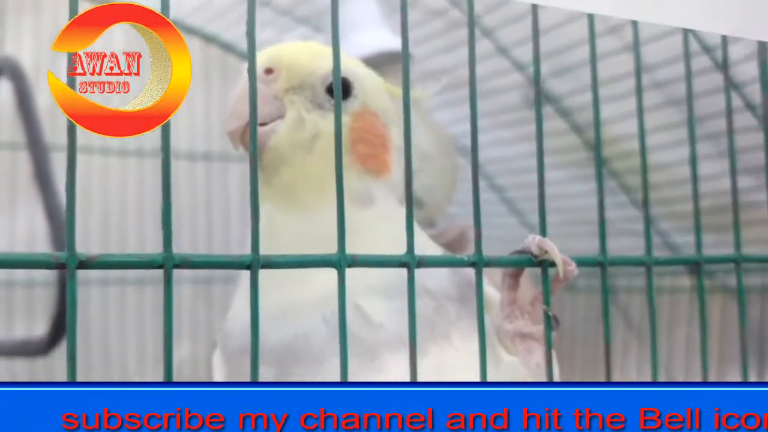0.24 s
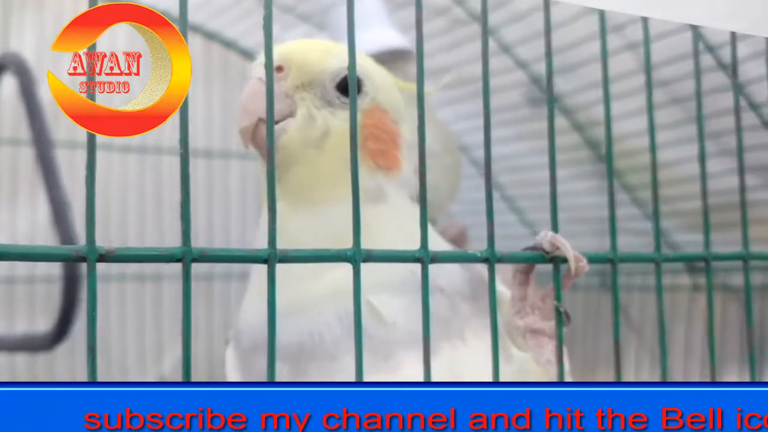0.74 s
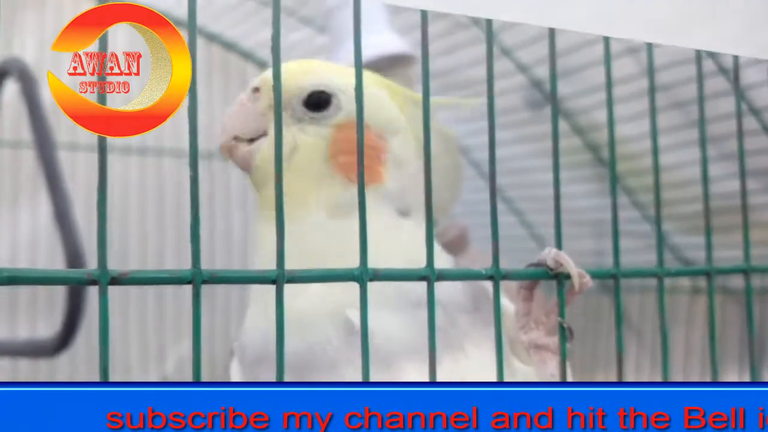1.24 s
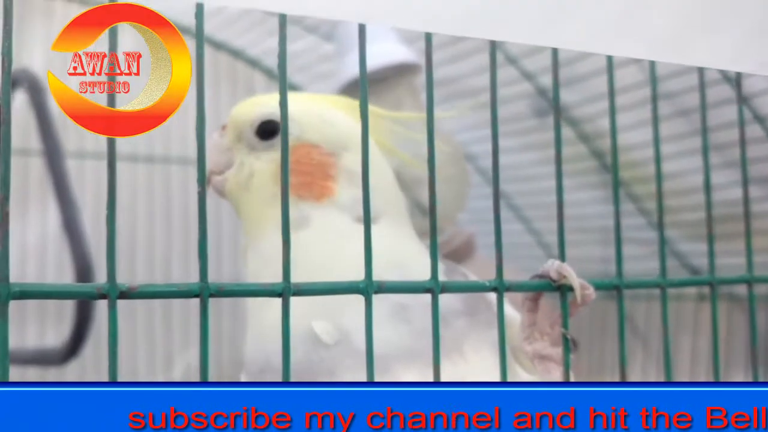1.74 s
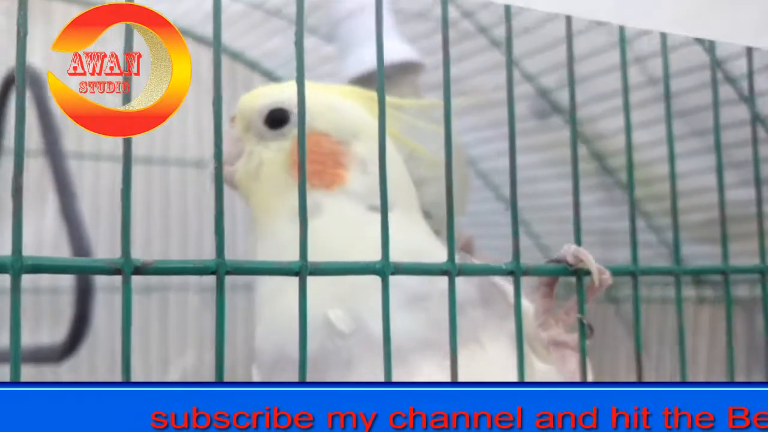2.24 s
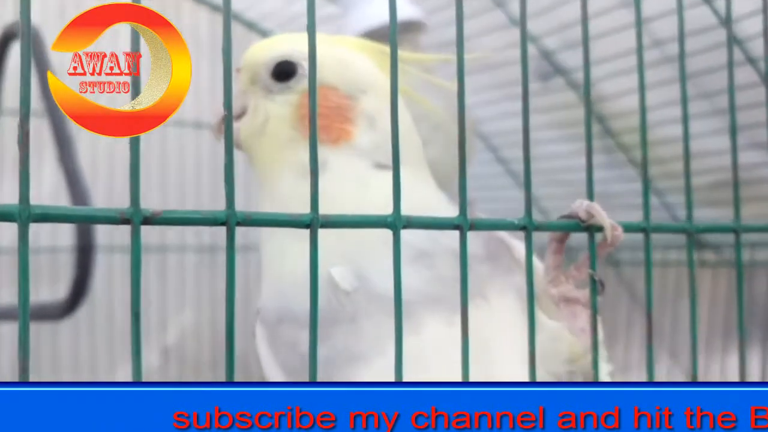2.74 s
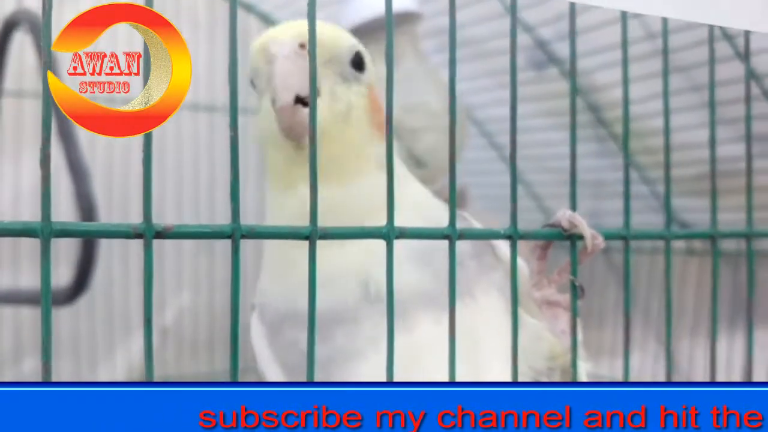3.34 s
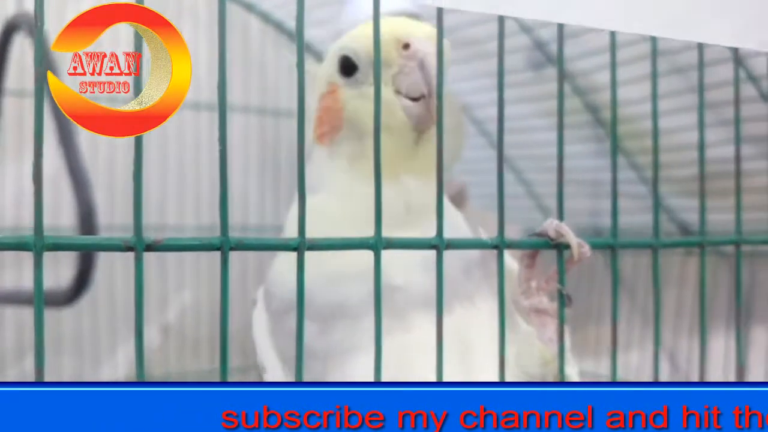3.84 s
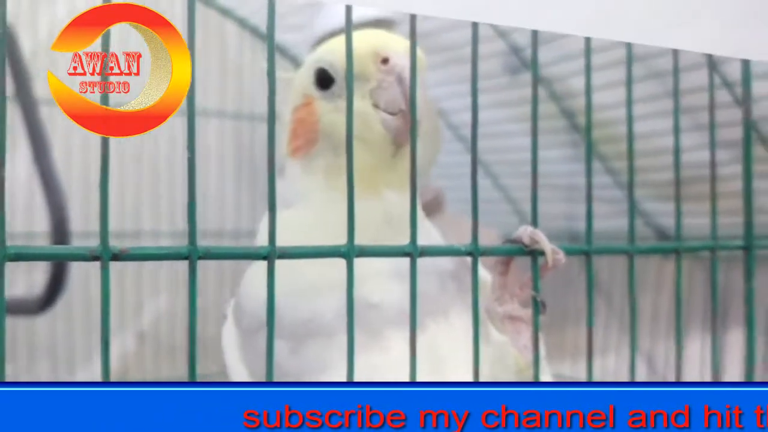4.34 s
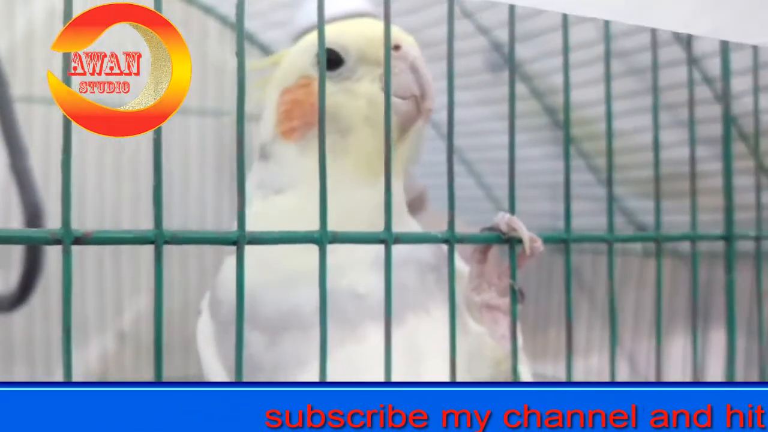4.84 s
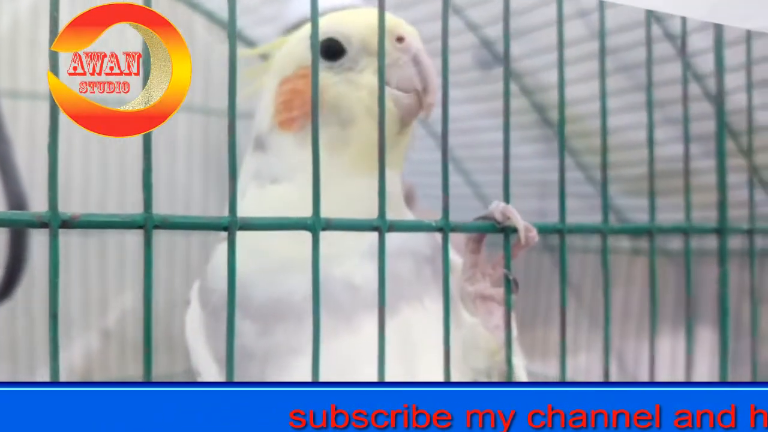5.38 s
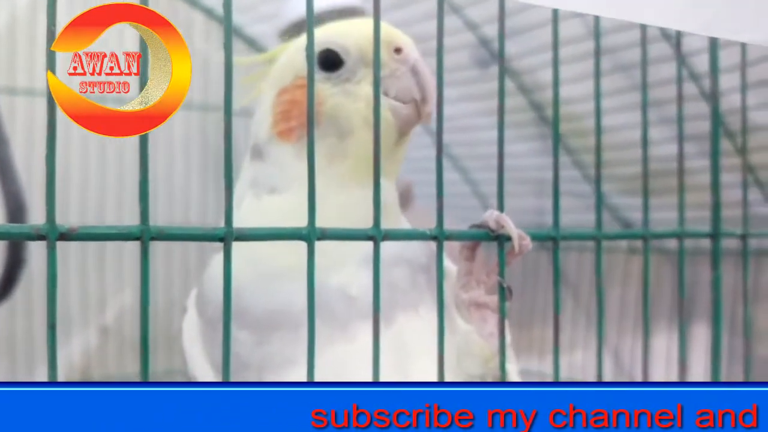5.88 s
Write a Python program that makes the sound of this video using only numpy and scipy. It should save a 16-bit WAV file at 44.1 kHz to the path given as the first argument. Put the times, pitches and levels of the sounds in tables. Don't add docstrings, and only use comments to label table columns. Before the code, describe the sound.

A cockatiel close by gives short, clear falling whistles in a small hard room, over fan hum, hiss and soft low air thumps.

```python
import sys
import numpy as np
from scipy import signal
from scipy.fft import rfft, irfft
from scipy.io import wavfile
from scipy.ndimage import uniform_filter1d

SR = 44100
rng = np.random.default_rng(int(sys.argv[2]) if len(sys.argv) > 2 else 0)


def unload_audio(sound):
    columns = np.transpose(np.atleast_2d(sound))
    steps = np.round(np.clip(columns, -1, 1) * 32767)
    wavfile.write(sys.argv[1], SR, steps.astype(np.int16))


def invert_db(level):
    return 10 ** (np.asarray(level, dtype=float) / 20)


N = 269451


def evened(x):
    return x / np.sqrt(np.mean(x ** 2) + 1e-20)


def read(points, hz):
    f, value = np.transpose(points)
    return np.interp(np.log(hz + 1), np.log(f + 1), value)


def add(mix, start_s, sound):
    part = mix[..., max(round(start_s * SR), 0):][..., :sound.shape[-1]]
    part += sound[..., :part.shape[-1]]


def wobble(count, size):
    return evened(uniform_filter1d(uniform_filter1d(rng.standard_normal(count), size), size))


# freq_hz, density_db (per Hz)
AIR_SPECTRUM = [(20, -34), (60, 0.5), (150, -7.5), (300, -8), (950, -11.5), (1200, -3), (1550, 0.15),
                (1900, -6), (2080, -18), (3100, -11.5), (3600, -22.5), (8500, -34.5), (13000, -34),
                (15200, -26)]


def air(level_db=-56.5, patchy_db=2.0, throb_db=-4.5, left_db=1.67):
    frames, hz = N // 256 + 5, np.fft.rfftfreq(1024, 1 / SR)
    a, b, c, d, patches = rng.standard_normal((frames, 513, 5)).T
    patches = evened(uniform_filter1d(uniform_filter1d(patches, 10, 0), 12, 1))
    throb = wobble(frames, 4) * np.exp(-((hz[:, None] - 1550) / 450) ** 2)
    z = np.array([a + 1j * b, c + 1j * d])
    z *= invert_db(read(AIR_SPECTRUM, hz)[:, None] + patchy_db * patches + throb_db * throb)
    hiss = evened(signal.istft(z, nperseg=1024, noverlap=768)[1][:, :N])
    return invert_db(level_db + np.array([[left_db], [-left_db]])) * hiss


# freq_hz, width_hz, level_db
MOTOR = (140, 29.6, -71)


def hum():
    hz, width_hz, db = MOTOR
    size = round(SR / width_hz / 2)
    fuzz = wobble(N, size) + 1j * wobble(N, size)
    carrier = np.exp(2j * np.pi * hz * np.arange(N) / SR)
    return invert_db(db) * evened((fuzz * carrier).real)


# time_s, pitch_hz, level_db
FAR_WHINE = [
    (1.76, 1304, -66),
    (2.183, 1212, -64.5),
    (2.21, 1270, -77),
]


def whine():
    s, hz, db = np.transpose(FAR_WHINE)
    t = np.arange(s[0], s[-1], 1 / SR)
    phase = 2 * np.pi * np.cumsum(np.interp(t, s, hz)) / SR
    tone = np.sqrt(2) * invert_db(np.interp(t, s, db)) * np.cos(phase)
    waver = invert_db(2.5 * np.array([wobble(len(t), 700), wobble(len(t), 700)]))
    return s[0], tone * signal.windows.tukey(len(t), .2) * waver


# peak_s, peak_db, freq_hz, cycles
AIR_PUFFS = [(0.162, -26.5, 213, 0.48), (0.212, -46, 151, 1.3), (0.243, -40.5, 109.4, 1.4),
             (2.295, -47.5, 142, 1.4), (2.387, -33.5, 110, 0.73), (2.478, -42.5, 96, 3.2),
             (2.517, -39.5, 106, 1.1), (2.546, -42, 110, 3.4), (2.569, -35.5, 169, 0.2),
             (2.587, -32.5, 210, 0.33), (2.61, -47, 194, 1.2), (2.649, -33.5, 135, 0.47),
             (2.674, -47, 113, 5.4), (2.754, -43, 96, 1.7), (2.778, -40, 113, 0.53),
             (2.879, -28.5, 132, 0.91), (3.036, -34, 120, 0.77), (3.058, -45, 93, 1.9),
             (3.078, -30.5, 118, 0.87), (3.11, -43, 109, 4.5), (3.153, -45, 134, 0.54),
             (3.186, -40, 104, 1.6), (3.205, -36, 118, 1.05), (3.227, -49.5, 78, 1.7), (3.487, -37, 457, 3),
             (3.556, -50, 218, 1.5), (4.145, -25.5, 139, 0.29), (6.076, -46, 262, 2.2),
             (3.502, -43.5, 77, 1.8),
]


def puff(peak_s, db, hz, cycles, sag=0.1, right_db=-22):
    u = np.arange(-2 * SR // 100, 4 * SR // 100) / SR * hz / cycles
    shape = np.exp(-(u / np.where(u < 0, .45, .7)) ** 2)
    swing = np.cos(2 * np.pi * cycles * u / (1 + sag * abs(u)) + 0.29)
    push = -invert_db(db) * shape * swing * signal.windows.tukey(len(u), .3)
    return peak_s - .02, push * invert_db([[0], [right_db]])


# left_ms, left_db, right_ms, right_db
REFLECTIONS = [(2.1, -114, 2.897, -12), (4.7, -12, 5.3, -7.5)]
# t60_s, level_db
DECAYS = [(0.196, -12.5), (0.802, -27.5)]


def room(x):
    response = np.zeros((2, SR))
    at = np.arange(500, SR - 20, 20) + rng.integers(0, 20, (2, (SR - 501) // 20))
    np.put_along_axis(response, at, rng.choice([-1., 1.], at.shape), 1)
    t = np.arange(SR) / SR
    tap_power = 0
    for t60, db in DECAYS:
        tap_power = tap_power + invert_db(2 * (db - 60 * t / t60)) * 20 * 6 * np.log(10) / t60 / SR
    response *= np.sqrt(tap_power)
    for left_ms, left_db, right_ms, right_db in REFLECTIONS:
        response[0, round(left_ms * SR / 1000)] += invert_db(left_db)
        response[1, round(right_ms * SR / 1000)] += invert_db(right_db)
    return signal.fftconvolve(x[None], response, axes=1)[:, :N]


# time_s, left_lead_samples
PORT_LEADS = [(0, 9), (1.5, 9), (1.66, 10.5), (2.2, 4), (2.38, 12.5), (2.54, 5.5), (2.74, 7.5), (3.22, 12),
              (3.4, 7), (3.55, -7), (3.68, 6), (6.1, 6)]
# start_s, end_s, level_db (re the whistle)
HALF_PITCH = [
    (5.659, 5.694, -9.5),
]
# freq_hz, level_db (re the whistle)
BEAK_COLOUR = [(3800, -46), (5100, -12), (6500, -22), (8500, -47.5), (12000, -27.5), (15000, -20.5),
               (16500, -51)]


def note(t, hz, effort_db, octave_db, pan_db, jitter=0.0032, shimmer_db=1.05, pressed=0.56, rush_db=-38,
         flutter_db=2.0):
    count = len(t)
    lag = np.interp(t[0], *np.transpose(PORT_LEADS))
    hz, effort_db, octave_db = (uniform_filter1d(c, 60) for c in (hz, effort_db, octave_db))
    turns = np.cumsum(hz * (1 + jitter * wobble(count, 60))) / SR + rng.random()
    half = sum(invert_db(db) * np.clip(np.minimum(t - a, b - t) / 0.006, 0, 1) for a, b, db in HALF_PITCH)
    level = np.sqrt(2) * invert_db(effort_db + shimmer_db * wobble(count, 90))
    beak = signal.butter(2, [4500, 12000], "bandpass", fs=SR)

    def flutter():
        return invert_db(flutter_db * wobble(count, 60))

    octave_db = octave_db - np.clip((3500 - 2 * hz) / 30, 0, 20)
    octave = flutter() * invert_db(octave_db)
    higher = []
    for k in range(3, 9):
        higher.append((k, invert_db(read(BEAK_COLOUR, k * hz) + pressed * octave_db) * flutter()))
    ports = []
    for side in (1, -1):
        phase = 2 * np.pi * (turns + side * .5 * lag * hz / SR)
        overtones = octave * np.cos(2 * phase) + sum(g * np.cos(k * phase) for k, g in higher)
        half_lines = half * (np.cos(1.5 * phase) + .1 * np.cos(.5 * phase))
        rush = invert_db(rush_db) * signal.lfilter(*beak, rng.standard_normal(count))
        ports.append(invert_db(side * .5 * pan_db) * (np.cos(phase) + overtones + half_lines + rush))
    return t[0], level * np.array(ports) * signal.windows.tukey(count, .08)


# time_s, pitch_hz, effort_db
PEEP_CURVES = [
    [(.75, 2133, -68), (.757, 2138, -27), (.773, 1821, -22.5), (.798, 1787, -28.5), (.808, 1540, -30),
     (.824, 1580, -58)],
    [(1.493, 1768, -41), (1.51, 1585, -31), (1.551, 1632, -28), (1.564, 1510, -57)],
    [(2.216, 1210, -59), (2.222, 1254, -37), (2.233, 1310, -40), (2.268, 1383, -41), (2.278, 1180, -47)],
    [(3.546, 1540, -35), (3.552, 1529, -36.5), (3.565, 1582, -29), (3.585, 1698, -42.5), (3.596, 1765, -24),
     (3.619, 1679, -31), (3.632, 1574, -53)],
    [(5.637, 1600, -58), (5.644, 1630, -36), (5.66, 1443, -32.5), (5.679, 1502, -31.5), (5.704, 1390, -38)],
]
# octave_db (re the whistle), octave_change_db (along the note), left_right_db
PEEP_TONE = [(-24.5, 16, 5.5), (-24.5, 2.5, -6), (-18.5, 23, -4.5), (-21.5, 8.5, -1.2), (-34, 22, -1.5)]
# time_s, pitch_hz, effort_db
BROKEN_CURVES = [
    [(2.54, 2265, -36.5), (2.566, 2136, -30), (2.605, 2178, -13.5), (2.617, 2053, -37),
     (2.625, 1640, -35.5), (2.634, 1450, -39)],
    [(1.66, 2360, -60), (1.668, 2342, -33.5), (1.688, 2427, -17.5), (1.7, 2338, -19), (1.721, 2348, -24.5),
     (1.739, 2140, -41.5)],
    [(2.377, 2160, -49), (2.389, 2112, -24), (2.409, 2056, -27.5), (2.42, 2002, -28.5), (2.428, 1984, -25),
     (2.444, 1903, -38.5)],
    [(2.746, 2369, -25), (2.762, 2244, -17), (2.803, 2236, -14.5), (2.815, 2126, -18), (2.82, 1974, -23),
     (2.835, 1840, -42.5)],
    [(4.205, 1932, -63), (4.211, 1870, -33), (4.217, 2104, -33), (4.255, 2220, -31), (4.265, 2080, -29.5),
     (4.277, 1400, -28), (4.293, 1107, -53)],
]
# octave_db (re the whistle), octave_change_db (along the note), left_right_db
BROKEN_TONE = [(-26.5, -7.5, 6), (-23, -5.5, 2), (-5, -4.5, 7), (-12.5, -13, 2.5), (-26.5, 1, 2)]


def peep(rows, octave_db, change_db):
    s, hz, effort_db = np.transpose(rows)
    t = np.arange(s[0], s[-1], 1 / SR)
    along = (t - s[0]) / (s[-1] - s[0])
    return t, np.interp(t, s, hz), np.interp(t, s, effort_db), octave_db + change_db * along


def peeps_and_broken(bird):
    for rows, (*octave, pan_db) in zip(PEEP_CURVES + BROKEN_CURVES, PEEP_TONE + BROKEN_TONE):
        add(bird, *note(*peep(rows, *octave), pan_db))


# freq_hz, width_hz, level_db
WINDPIPE_PEAKS = [(2230, 160, 4), (1815, 94, 2), (1540, 113, 3)]


def falling(glide, landing_hz, plunge_ms, landing_db, edges, voice):
    onset, landing, entry_hz, aim_hz = glide
    scoop_hz, lift_db, release_ms, surge = edges
    effort_db, swell_db, early, octave_db = voice
    attack_s, attack_db, release_db, sag_hz_per_s = 0.0063, -25.5, -15.5, 16000
    snap_s, snap_share, scoop_s = .005, .3, 0.01087
    swell_ends = 1.96
    t = np.arange(max(onset, 0), landing + release_ms / 1000, 1 / SR)
    since, length, plunge_s = t - onset, landing - onset, plunge_ms / 1000
    before, after = np.minimum(t - landing, 0), np.maximum(t - landing, 0)
    given = (1 - snap_share) * np.exp(before / plunge_s) + snap_share * np.exp(before / snap_s)

    course = entry_hz + (aim_hz - entry_hz) * np.minimum(since / length, 1)
    course = course + scoop_hz * np.exp(-since / scoop_s)
    hz = course - (aim_hz - landing_hz) * given - sag_hz_per_s * after

    short = np.clip(1 - since / (length - swell_ends * plunge_s), 0, 1) ** early
    short = short ** surge / (short ** surge + (1 - short) ** surge)
    pipe_db = sum(db * np.exp(-((hz - f) / width) ** 2) for f, width, db in WINDPIPE_PEAKS)
    edges_db = attack_db * np.clip(1 - since / attack_s, 0, 1) + release_db * after * 1000 / release_ms
    effort = effort_db - swell_db * short + (landing_db - effort_db) * given + edges_db + pipe_db
    return t, hz, effort, octave_db + lift_db * given


# onset_s, landing_s, entry_hz, aim_hz, landing_hz
DIP_GLIDES = [
    (1.114, 1.17, 2209, 2232, 1834),
    (3.377, 3.429, 2109, 2194, 1857),
    (3.91, 3.966, 2215, 2171, 1840),
]
# effort_db, swell_db, swell_earliness, octave_db (re the whistle), left_right_db
DIP_BREATH = [(-18.5, 8.5, 0.8, -13.5, -1.5), (-20, 4.5, .9, -11, 0.3), (-18, 12.5, 2.5, -19.5, 0.5)]


def dips(bird):
    edges = (110, 13.5, 10.5, 2.3)
    for (*glide, landing_hz), (*voice, pan_db) in zip(DIP_GLIDES, DIP_BREATH):
        add(bird, *note(*falling(glide, landing_hz, 8, -26, edges, voice), pan_db))


# onset_s, landing_s, entry_hz, aim_hz, plunge_ms (time constant)
DIVE_GLIDES = [(-.01, 0.028, 2420, 2304, 10.4), (0.137, 0.193, 2380, 2404, 10.4),
               (0.332, 0.385, 2084, 2092, 6.1), (0.5, 0.576, 2141, 2353, 7.2),
               (0.909, .982, 2374, 2355, 13), (1.281, 1.334, 2248, 2230, 7.6),
               (2.893, 2.975, 2578, 2517, 22), (3.065, 3.137, 2594, 2367, 18),
               (3.223, 3.291, 2610, 2383, 24), (3.72, 3.783, 2070, 2318, 9.3),
               (4.061, 4.134, 2490, 2425, 18), (4.431, 4.507, 2538, 2406, 20),
               (4.587, 4.666, 2522, 2632, 20), (4.808, 4.867, 2427, 2324, 19),
               (4.974, 5.049, 2190, 2380, 9.8), (5.217, 5.279, 2230, 2305, 11),
               (5.395, 5.472, 2073, 2347, 8.3), (5.793, 5.87, 2454, 2300, 12),
               (6.019, 6.077, 2479, 2277, 12.4)]
# scoop_hz, octave_lift_db (in the plunge), release_ms,
# surge (over 1 gathers the swell into one step)
DIVE_ENDS = [(-7.5, -17, 15.5, 1.1), (-25, -13, 9.1, 2.2), (60.5, -1, 20, 1.2), (-15, -18.5, 8, 1.7),
             (-200, -31, 9.5, 1.8), (-35, -15, 8, 3.5), (-130, -17, 6.5, 1.2), (-120, -7, 10.7, 1.6),
             (-150, 21.5, 3.1, 0.68), (-120, -10, 4.9, 1.4), (-140, -30, 11, 1), (-220, -35, 2.6, 0.77),
             (-220, -53, 22.7, 1.5), (-37.5, -28, 10, 1), (-88, -12, 17, 1.5), (51, 0.5, 13, 2.2),
             (75, -32, 9.9, 3.4), (-260, -25, 5.8, 2.9), (-190, -2, 16, 0.97)]
# effort_db, swell_db, swell_earliness (under 1 late, over 1 early),
# octave_db (re the whistle), left_right_db
DIVE_BREATH = [(-18.5, -17, .9, -29, -2.5), (-22, 13.5, 0.71, -28, 2), (-30, 2, 1, -35.5, 2.5),
               (-19.5, 20, 0.45, -29, -2.6), (-19.5, 21, 0.64, -28.5, 2.8), (-12.5, 10, 0.34, -29, -1.5),
               (-16, 15, 1.1, -36, 3.5), (-15.5, 14.5, 0.69, -25.5, 7.5), (-16, 14.5, 0.43, -19.5, 1),
               (-17, 16, 0.9, -31.5, 2), (-14.5, 18, 3.3, -29, -2), (-14, 14.5, 1.2, -24, -1),
               (-13, 13.5, 0.59, -22, -0.7), (-19, 11, 1.7, -28.5, 1.3), (-15.5, 27, 1.02, -36, -0.8),
               (-19, 10, 1.55, -30.5, -3), (-18, 20, 0.57, -35.5, -1.8), (-21.5, 17.5, 1.4, -29.5, -.6),
               (-19.5, 11.5, 1.9, -33, -0.2)]


def dives(bird):
    bottom_hz, landing_db = 1400, -31.5
    for (*glide, plunge_ms), edges, (*voice, pan_db) in zip(DIVE_GLIDES, DIVE_ENDS, DIVE_BREATH):
        add(bird, *note(*falling(glide, bottom_hz, plunge_ms, landing_db, edges, voice), pan_db))


def scene():
    bird = np.zeros((2, N))
    peeps_and_broken(bird)
    dips(bird)
    dives(bird)
    mix = bird + room(bird[0]) + air() + hum()
    add(mix, *whine())
    for row in AIR_PUFFS:
        add(mix, *puff(*row))
    return mix


def resampled(dry):
    source_rate, block_in, block_out, block_start = 48000, 1024, 941, 430
    fine = signal.resample_poly(dry, block_in, block_out, axis=1)
    block, step = np.divmod(np.arange(N) - block_start, block_out)
    place = block * block_in + step * source_rate // SR + block_start * block_in // block_out
    return fine[:, np.clip(place, 0, fine.shape[1] - 1).astype(int)]


def masked(x, depth_db=36, fall_db=4.0, scatter_db=6, low_hz=2600):
    hz, _, z = signal.stft(x, SR, nperseg=1536)
    bands = np.arange(0, len(hz), 12)
    band_hz = hz[bands, None]
    power_db = 10 * np.log10(np.add.reduceat((abs(z) ** 2).sum(0), bands, axis=0) + 1e-20)
    limit_db = power_db.max(0) - depth_db - fall_db * band_hz / 1000
    limit_db = limit_db + scatter_db * rng.standard_normal(power_db.shape)
    spare = (band_hz > 11600) & (band_hz < 14000)
    usual_db = np.median(power_db, axis=1)[:, None]
    limit_db = np.where(spare, np.maximum(limit_db, usual_db), limit_db)
    keep = np.repeat(power_db > limit_db, 12, axis=0)[:len(hz)] | (hz[:, None] < low_hz)
    return signal.istft(z * keep, SR, nperseg=1536)[1][:, :N]


def top_cut(x):
    return signal.sosfilt(signal.butter(12, 15960, fs=SR, output="sos"), x)


def record(dry):
    picked = resampled(dry)
    hz = np.fft.rfftfreq(N, 1 / SR)
    low_cut = 1 / np.sqrt(1 + (35 / (hz + 1)) ** 4)
    finished = masked(irfft(rfft(picked) * low_cut, N))
    return top_cut(finished)


dry = scene()
out = record(dry)
unload_audio(out)
```